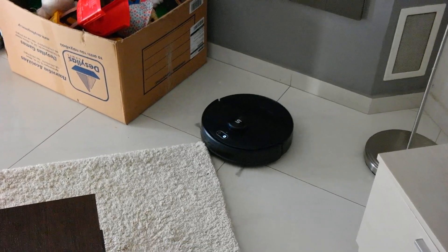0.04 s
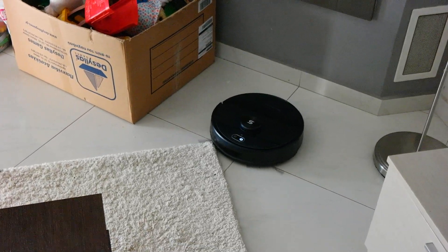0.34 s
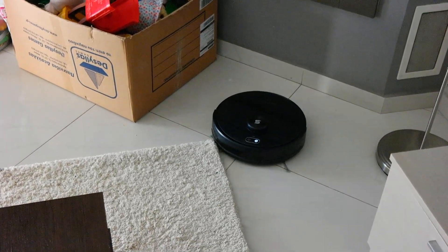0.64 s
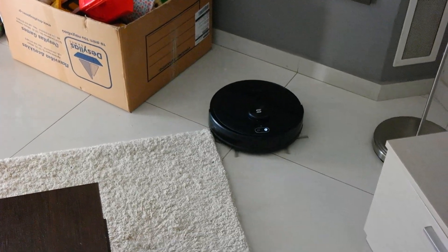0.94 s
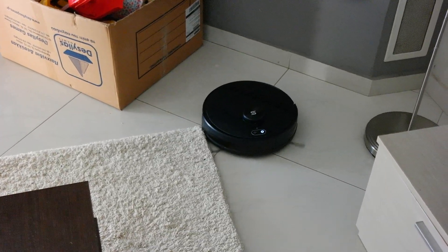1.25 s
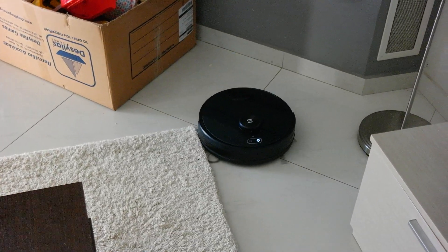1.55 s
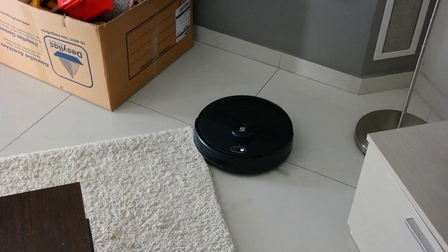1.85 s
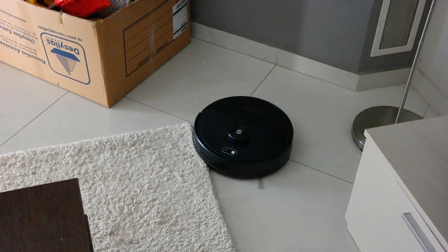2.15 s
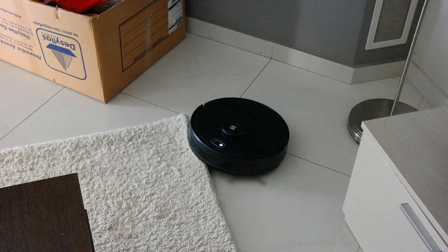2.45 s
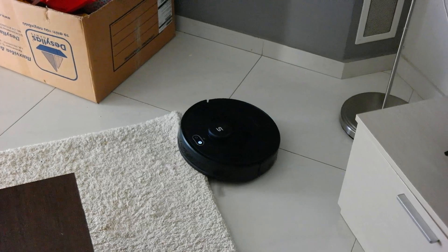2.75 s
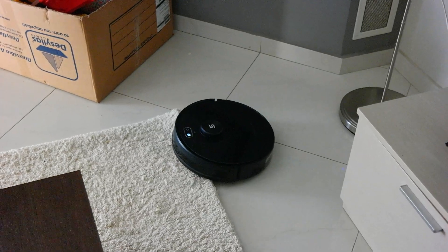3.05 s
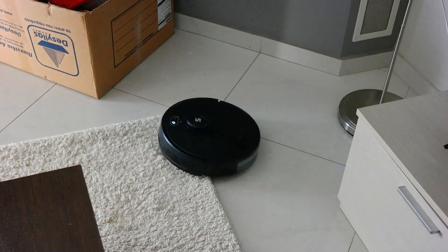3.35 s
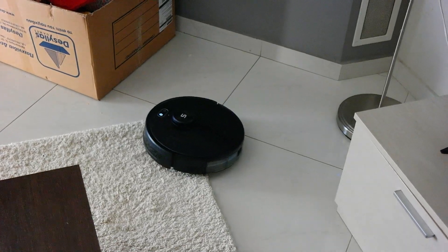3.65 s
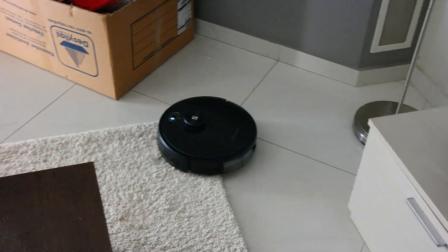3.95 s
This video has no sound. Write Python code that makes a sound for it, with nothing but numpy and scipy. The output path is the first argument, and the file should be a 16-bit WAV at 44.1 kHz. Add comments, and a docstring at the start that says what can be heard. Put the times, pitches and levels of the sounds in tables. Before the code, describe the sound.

A robot vacuum runs in a small tiled room with rushing air, a wavering fan whine and a motor hum. Past halfway it knocks with a brief shudder, then clacks lightly and rasps onto a rug.

```python
"""Robot vacuum at a rug's edge

In a small tiled room, a fan whines over rushing air, the brush motor hums and the side brush swishes.
The colour shifts as the robot turns. On the rug the roller drags, shakes the shell and rasps.
The chassis knocks once against the rug and shudders; lighter clacks and scrapes follow."""
import sys
import numpy as np
from scipy import signal
from scipy.fft import rfft, irfft
from scipy.io import wavfile
from scipy.ndimage import uniform_filter1d

SR = 44100
rng = np.random.default_rng(int(sys.argv[2]) if len(sys.argv) > 2 else 0)


def transcribe(u):
    """Save the signal u as a 16-bit wav file named by the first command-line argument.

    u: samples, shape (n,) or (channels, n), limited to [-1, 1]; the rate is SR.
    q: integer samples, one column per channel.
    """
    v = np.clip(np.atleast_2d(u).T, -1, 1)
    q = np.round(v * 32767).astype(np.int16)
    wavfile.write(sys.argv[1], SR, q)


N = 176400
T, HZ = np.arange(N) / SR, np.fft.rfftfreq(N, 1 / SR)

# left-right likeness: f/Hz, coherence/0-1
COHERENCE = [(30, 0.9), (60, 0), (150, 0.98), (400, 0.99), (1000, 0.94), (2000, 0.98), (4000, 0.85),
             (8000, 0.06), (15000, 0)]
# airflow colour within each band: f/Hz, level/dB
AIR_COLOUR = [(18, -77), (30, -80), (103, -25.5), (178, -12.5), (271, -5.5), (317, 7), (401, -5.5),
              (457, -3.5), (521, -1.5), (579, -4), (772, 0), (880, 0), (977, -1), (1690, -2), (1830, -5.5),
              (1980, -1.5), (2320, -9.5), (2710, -5), (3180, -7.5), (3620, -10), (5650, -14), (6110, -17.5),
              (6970, -14), (9300, -21.5), (15700, -22.5)]
# airflow bands: lower edge/Hz, trim/dB, rms flutter/dB
AIR_BANDS = [(20, -3.5, 0.8), (440, -1, 0.6), (1233, 0, 0.5), (2194, 1, .5), (3300, 1.5, 0.77),
             (5180, 3, 0.74), (7980, 5, 0.43)]
# airflow before trim: t/s, then level/dB for each band, bass first
AIR_LEVELS = [(0.03, -37.5, -37, -36, -39.5, -40, -43, -45), (0.49, -45.5, -36, -35, -40, -40, -42, -44),
              (0.73, -40, -37, -35.5, -42.5, -40, -42, -42.5),
              (1.01, -40.5, -35, -37.5, -38, -38.5, -41, -40),
              (1.21, -39.5, -35.5, -35, -39, -38.5, -41, -40),
              (1.54, -43.5, -35.5, -37.5, -41, -41.5, -40.5, -42.5),
              (1.96, -38, -35, -37, -38.5, -39, -42, -45),
              (2.23, -42, -35, -39.5, -40.5, -42.5, -42.5, -46),
              (2.42, -31.5, -35, -35.5, -39, -40, -42, -47.5),
              (2.57, -34, -32.5, -36, -36.5, -39.5, -42, -46),
              (2.78, -37, -37.5, -35.5, -41.5, -42, -40.5, -44.5),
              (3.16, -38.5, -35.5, -37, -43, -40.5, -40.5, -43),
              (3.33, -39.5, -38.5, -38, -44, -39.5, -41, -42),
              (3.47, -44, -37.5, -40, -41, -42, -42, -43.5),
              (3.95, -37, -38.5, -42, -39, -41.5, -42, -42.5)]
# exhaust duct resonance: t/s, f/Hz, level/dB
DUCT_RESONANCE = [(0, 2692, -54), (.45, 2674, -49), (.65, 2620, -39), (.9, 2720, -41), (1.1, 2824, -38),
                  (1.45, 2770, -37.3), (1.7, 2680, -39), (1.9, 2770, -50), (2.15, 2790, -40.5),
                  (2.5, 2877, -44), (3.1, 2790, -45), (3.6, 3016, -42), (4, 2845, -50)]
# side brush on tiles: t/s, level/dB
SWISH_LEVEL = [(0, -51), (.7, -50), (1.45, -46), (1.75, -47), (2.1, -58), (2.8, -45), (3.15, -54),
               (3.4, -45), (3.7, -56), (4, -50)]
# fan blade tone: t/s, f/Hz
BLADE_PITCH = [(0, 1790), (.3, 1787), (1.0, 1790), (1.75, 1791), (2.35, 1780), (3.0, 1779), (4, 1780)]
# blade tone, swinging as the robot crosses standing waves: t/s, level/dB
BLADE_LEVEL = [(0, -41), (.2, -41), (.45, -45), (.62, -35.5), (.82, -35.5), (1.0, -43), (1.15, -50),
               (1.42, -38), (1.65, -35), (1.78, -45), (1.92, -36.5), (2.15, -41), (2.3, -37), (2.46, -36),
               (2.54, -44), (2.7, -34.5), (2.88, -41), (3.03, -36), (3.18, -38), (3.36, -47), (3.55, -52),
               (4, -55)]
# blade tone's octave: t/s, level/dB
OCTAVE_LEVEL = [(0, -49), (.8, -55), (1.1, -52), (1.7, -55), (1.95, -42), (2.15, -52), (2.7, -54),
                (2.95, -46), (3.15, -48), (3.3, -43), (4, -44.5)]
# brush motor: t/s, f/Hz, level/dB
BRUSH_HUM = [(0, 797, -39), (.25, 797, -37), (.43, 793, -42), (.55, 787, -40), (.85, 792, -38.5),
             (1.1, 788, -43), (1.5, 781, -45.5), (1.8, 786.6, -45), (2.3, 794, -44.5), (2.8, 795.7, -43),
             (3.1, 789.4, -40.5), (3.5, 793.6, -47.5), (4, 775, -76)]
# brush gearing: ratio to motor pitch, tile level/dB, rug level/dB
GEAR_TONES = [(5 / 12, -56, -45), (6 / 12, -55, -47)]
# drive whistles: f/Hz, relative level/dB
WHISTLE_TONES = [(15524, 0), (15557, -4), (13205, -7)]
# all whistles: t/s, level/dB
WHISTLE_LEVEL = [(0, -61), (.35, -55), (.75, -61), (.88, -52), (1.35, -51), (1.5, -58), (1.95, -57),
                 (2.1, -64), (2.7, -63), (3.0, -52), (3.35, -52), (3.55, -59), (4, -56)]
# shell resonances: f/Hz, half-width/Hz, tile level/dB, rug level/dB
SHELL_MODES = [(196.4, 31, -61.5, -59.5), (259.7, 14, -58.5, -51.5), (304, 12.5, -59.5, -56),
               (368, 7.4, -58, -51), (420.6, 24, -47, -52), (529, 24, -50.5, -51), (720, 7.5, -48, -55),
               (984, 23, -45.5, -51.5), (1172, 8.27, -71, -48.5)]
# chassis blows, relative levels: t/s, thump/dB, crack/dB, clack/dB, tick/dB
BLOWS = [(2.4402, 1, -14, -14, -18), (2.4422, -20, 2, -6, -3), (2.4483, -1, -2, -3, -3),
         (2.461, -9, -16, -7, -18), (2.469, -8, -15, -8, -20), (2.483, -8, -15, -13, -21),
         (2.491, -3, -14, -13, -20), (2.503, -3, -13, -10, -20), (2.519, -4, -11, -10, -20),
         (2.527, -7, -16, -10, -24), (3.161, -40, -22, -18, -4), (3.288, -40, -24, -6, -20),
         (3.2945, -30, -22, 0, -15), (3.2995, -30, -16, -1, -12), (3.313, -36, -22, -3, -24)]
# chassis thump: f/Hz, relative level/dB, t60/s
CHASSIS_MODES = [(195, -8, .11), (250, 1.5, .08), (312, 1, .09), (371, -1, .09), (545, -12, .06),
                 (690, -6, .07), (810, -9, .06), (985, -2, .08)]
# bumper crack: f/Hz, relative level/dB
CRACK_COLOUR = [(130, -40), (240, 0), (1500, -1.5), (2700, 1), (3100, 3.5), (3850, 10), (4400, 0),
                (5500, -4), (6600, -0.5), (8000, -20), (15000, -29)]
# hollow plastic clack: f/Hz, relative level/dB
CLACK_COLOUR = [(60, -63), (300, -17), (800, -7), (1150, 6), (1500, -4), (2100, 2), (3500, -20),
                (6000, -10), (15000, -20)]
# latch tick: f/Hz, relative level/dB
TICK_COLOUR = [(80, -65), (500, -41), (2500, -9), (4500, -8), (7000, -6), (8500, -9.5), (10000, -5.5),
               (13500, -7), (16000, -6.5)]
# room decay: f/Hz, t60/s
ROOM_DECAY = [(100, 0.16), (500, 0.95), (2000, 0.14), (6000, 0.59), (15000, 0.34)]
# roller in the pile: t/s, level/dB
RASP_LEVEL = [(0, -70), (2.9, -58), (3.25, -44), (3.45, -38.5), (3.7, -39), (4, -41)]
# underside scrapes: t/s, length/s, f/Hz, half-width/Hz, level/dB
EDGE_SCRAPES = [(3.262, .026, 12500, 2000, -41), (3.322, .026, 4900, 700, -35),
                (3.358, .036, 12600, 1000, -42), (3.368, .05, 7250, 350, -41)]


def amp(db):
    """Decibels to gain."""
    return 10 ** (np.asarray(db) / 20)


def unit(x):
    """Scales to rms 1."""
    return x / np.sqrt(np.mean(x ** 2) + 1e-20)


def over_frequency(table, hz):
    """A table interpolated over log frequency."""
    f, value = np.transpose(table)
    return np.interp(np.log(hz + 1), np.log(f + 1), value)


def curves(table):
    """Each column of a table over time."""
    times_s, *columns = np.transpose(table)
    return [np.interp(T, times_s, column) for column in columns]


def add(mix, start_s, sound):
    """Mixes in a stereo sound."""
    part = mix[:, round(start_s * SR):][:, :sound.shape[1]]
    part += sound[:, :part.shape[1]]


def drift(rate_hz):
    """Smooth random motion, rms 1."""
    return unit(irfft(rfft(rng.standard_normal(N)) / (1 + (HZ / rate_hz) ** 4), N))


def noise_pair(left_lag_s=.00005):
    """Left and right spectra of partly coherent white noise."""
    common, separate = rfft(rng.standard_normal((2, N)))
    coherence = np.clip(over_frequency(COHERENCE, HZ), 0, 1)
    left = common * np.exp(-2j * np.pi * HZ * left_lag_s)
    right = coherence * common + np.sqrt(1 - coherence ** 2) * separate
    return np.array([left, right])


def ring(spectra, hz, half_width_hz):
    """Noise through one resonance, rms 1."""
    return unit(irfft(spectra / (1 + ((HZ - hz) / half_width_hz) ** 2), N))


def rub(hz, half_width_hz, rough_db=3):
    """Grainy noise in a resonance whose centre may move."""
    centre_hz = np.mean(hz)
    band = signal.hilbert(ring(noise_pair(), centre_hz, half_width_hz))
    shift = np.exp(2j * np.pi * np.cumsum(hz - centre_hz + np.zeros(N)) / SR)
    return unit((band * shift).real * amp(rough_db * drift(rate_hz=200)))


def tone(hz, scatter):
    """A rotor's tone with shifting reflections in each channel."""
    paths = np.array([1 + scatter * (drift(rate_hz=19) + 1j * drift(rate_hz=13)) for _ in range(2)])
    return unit((paths * np.exp(2j * np.pi * np.cumsum(hz) / SR)).real)


def floor_gain(tile_db, rug_db, start_s=1.5, full_s=2.73):
    """Gain as the roller passes from tiles to rug."""
    on_rug = np.clip((T - start_s) / (full_s - start_s), 0, 1)
    return amp(tile_db + (rug_db - tile_db) * on_rug)


def airflow():
    """Turbulent air coloured by the ducts; each band swells as the vent turns."""
    air = noise_pair() * amp(over_frequency(AIR_COLOUR, HZ))
    band_index = np.searchsorted([row[0] for row in AIR_BANDS], HZ) - 1
    out = np.zeros((2, N))
    for k, ((_, trim_db, flutter_db), db) in enumerate(zip(AIR_BANDS, curves(AIR_LEVELS))):
        band = unit(irfft(air * (band_index == k), N))
        out += amp(db + trim_db + flutter_db * drift(rate_hz=20)) * band
    return out


def exhaust_duct():
    """The duct's wandering resonance gives a hollow whirr."""
    hz, db = curves(DUCT_RESONANCE)
    return amp(db) * rub(hz, half_width_hz=150)


def side_brush(centre_hz=7200, wander_hz=260):
    """Bristles swish over the tiles."""
    hz = centre_hz + wander_hz * drift(rate_hz=3)
    return amp(curves(SWISH_LEVEL)[0]) * rub(hz, half_width_hz=380)


def reflections(x, positions=9, ripple_db=4, ripple_hz=45.3, onset_hz=700):
    """Nearby floor and walls ripple the spectrum; the ripple changes as the robot moves."""
    out, position = np.zeros((2, N)), np.linspace(0, positions - 1, N)
    for k in range(positions):
        ripple = unit(uniform_filter1d(rng.standard_normal(len(HZ)), int(ripple_hz / HZ[1])))
        colour = unit(amp(ripple_db * ripple * HZ / (HZ + onset_hz)))
        crossfade = np.maximum(1 - abs(position - k), 0)
        out += crossfade * irfft(rfft(x) * colour, N)
    return out


def fan(waver_hz=.99):
    """The suction fan's blade tone and its octave."""
    hz = curves(BLADE_PITCH)[0] + waver_hz * drift(rate_hz=32)
    blade = amp(curves(BLADE_LEVEL)[0]) * tone(hz, scatter=.12)
    octave = amp(curves(OCTAVE_LEVEL)[0]) * tone(2 * hz, scatter=.35)
    return blade + octave


def brush_motor(waver_hz=2.7):
    """The motor hums; its gears drone at fractions of its pitch, louder on the rug."""
    hz, db = curves(BRUSH_HUM)
    hz = hz + waver_hz * drift(rate_hz=20)
    hum = amp(db) * tone(hz, scatter=.074)
    for ratio, tile_db, rug_db in GEAR_TONES:
        flutter = 1 + .51 * drift(rate_hz=23)
        hum += floor_gain(tile_db, rug_db) * flutter * tone(ratio * hz, scatter=.017)
    return hum


def drive_whistles():
    """The motor drives whistle thinly; the close pair beats."""
    tones = sum(amp(db) * tone(np.full(N, hz), scatter=.67) for hz, db in WHISTLE_TONES)
    return amp(curves(WHISTLE_LEVEL)[0]) * tones


def roller():
    """The roller shakes the shell's modes; their balance shifts on the rug."""
    shake = noise_pair()
    return sum(floor_gain(tile_db, rug_db) * ring(shake, hz, half_width_hz)
               for hz, half_width_hz, tile_db, rug_db in SHELL_MODES)


def plastic_burst(colour, t60_s, strike_s=.0002):
    """Short dense ring of struck plastic, energy 1."""
    t = T[:4096]
    noise = irfft(noise_pair() * amp(over_frequency(colour, HZ)), N)[:, :len(t)]
    envelope = amp(-60 * t / t60_s) * (1 - np.exp(-t / strike_s))
    return unit(noise * envelope) / np.sqrt(len(t))


def knocks(low_cut_hz=170):
    """Each blow thumps the chassis and rattles its plastic parts; the room answers."""
    body, parts, t = np.zeros((2, N)), np.zeros((2, N)), T[:SR // 3]
    thump = sum((-1) ** k * amp(db - 60 * t / t60_s) * np.sin(2 * np.pi * hz * t)
                for k, (hz, db, t60_s) in enumerate(CHASSIS_MODES))
    for start_s, thump_db, crack_db, clack_db, tick_db in BLOWS:
        add(body, start_s, amp(thump_db - 25) * np.array([thump, thump]))
        add(parts, start_s, amp(crack_db + 4.5) * plastic_burst(CRACK_COLOUR, t60_s=.024))
        add(parts, start_s, amp(clack_db - 1.5) * plastic_burst(CLACK_COLOUR, t60_s=.034))
        add(parts, start_s, amp(tick_db + 5) * plastic_burst(TICK_COLOUR, t60_s=.089))
    reverb = room(amp(-6) * body + amp(-6.5) * parts)
    high_pass = signal.butter(6, low_cut_hz, "high", fs=SR, output="sos")
    return signal.sosfilt(high_pass, body + parts + reverb)


def room(x, build_s=.012):
    """Tail of a small hard room, longest in the low mids."""
    hz, t, noise = signal.stft(irfft(noise_pair(), N)[:, :SR // 2], SR, nperseg=256)
    envelope = amp(-60 * t / over_frequency(ROOM_DECAY, hz)[:, None]) * np.minimum(t / build_s, 1)
    _, tail = signal.istft(noise * envelope, SR, nperseg=256)
    return signal.fftconvolve(x, tail / np.linalg.norm(tail[0]), axes=1)[:, :N]


def rug_rasp():
    """The roller's bristles rasp in the pile, with a narrow whine."""
    whine = amp(-6) * ring(noise_pair(), hz=3865, half_width_hz=8)
    return amp(curves(RASP_LEVEL)[0]) * (rub(hz=3900, half_width_hz=300) + whine)


def scrapes(rough_db=3):
    """The underside drags over the rug's edge in short, grainy swells."""
    friction, out = noise_pair(), np.zeros((2, N))
    grain = unit(amp(rough_db * drift(rate_hz=270)))
    for start_s, length_s, hz, half_width_hz, db in EDGE_SCRAPES:
        swell = np.sin(np.pi * np.clip((T - start_s) / length_s, 0, 1))
        out += amp(db) * swell * ring(friction, hz, half_width_hz)
    return grain * out


def scene():
    """The running robot, its knocks and scrapes, in stereo."""
    lean_left, lean_right = amp([[.3], [-.3]]), amp([[-.8], [.8]])
    rush = lean_left * reflections(airflow() + exhaust_duct() + side_brush() + rug_rasp())
    motors = lean_right * fan() + brush_motor() + lean_right * drive_whistles()
    return rush + motors + roller() + knocks() + scrapes()


def record(dry):
    """Steep band limit at the top of the treble."""
    edge_hz = 15850
    low_pass = signal.firwin(511, edge_hz, window=("kaiser", 9), fs=SR)
    return signal.oaconvolve(dry, low_pass[None], "same")


dry = scene()
out = record(dry)
transcribe(out)
```